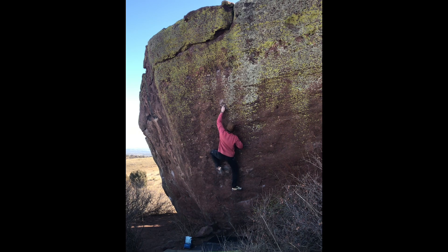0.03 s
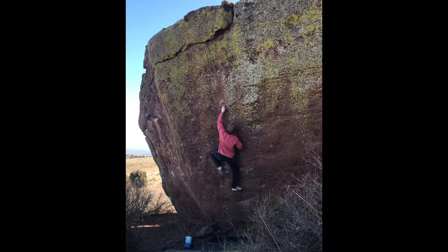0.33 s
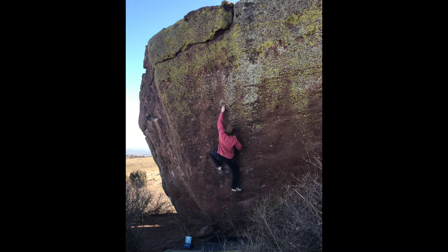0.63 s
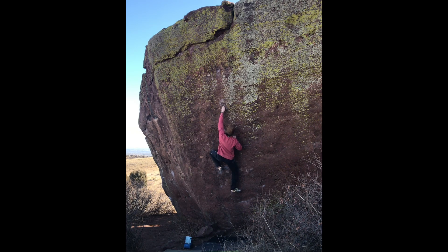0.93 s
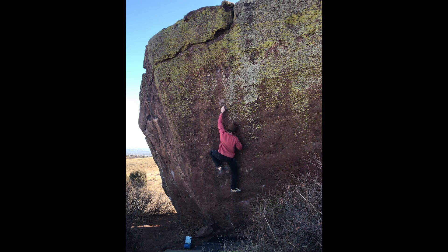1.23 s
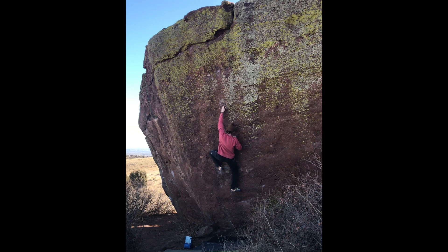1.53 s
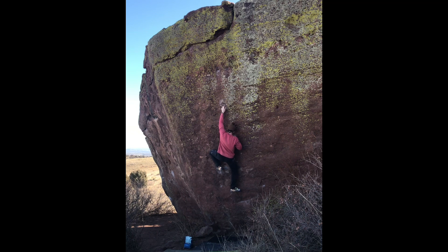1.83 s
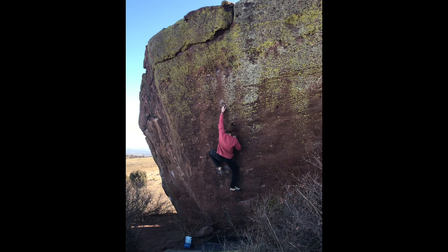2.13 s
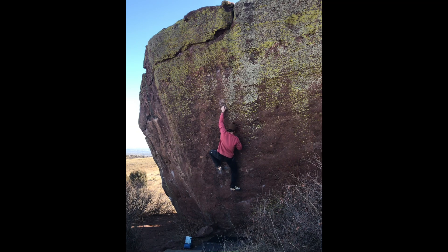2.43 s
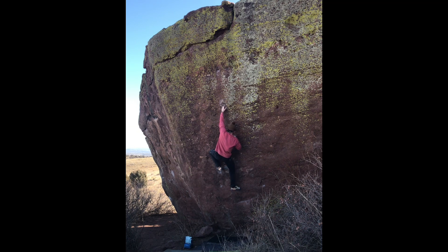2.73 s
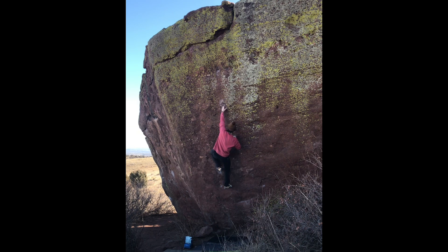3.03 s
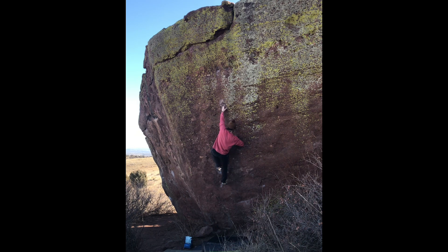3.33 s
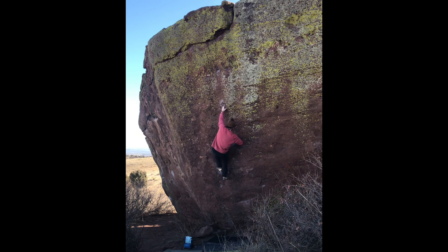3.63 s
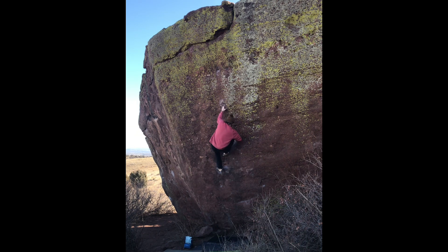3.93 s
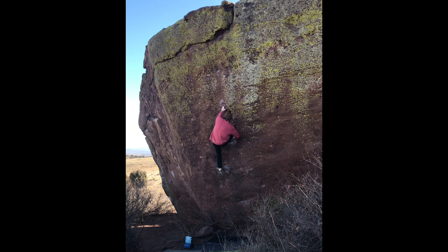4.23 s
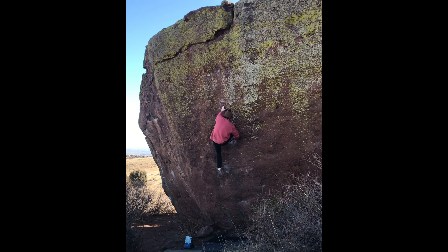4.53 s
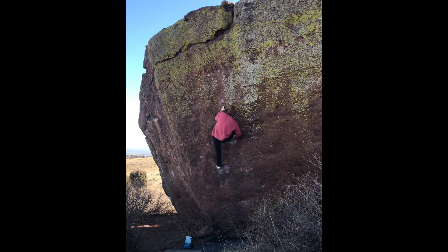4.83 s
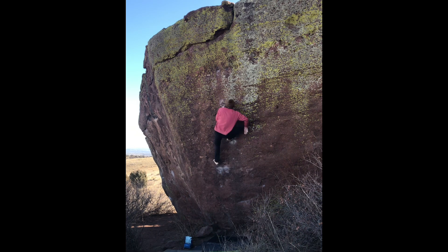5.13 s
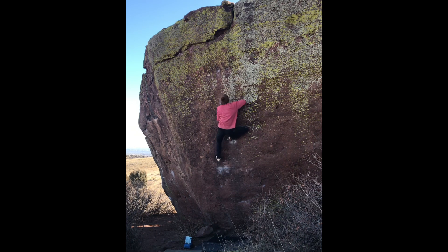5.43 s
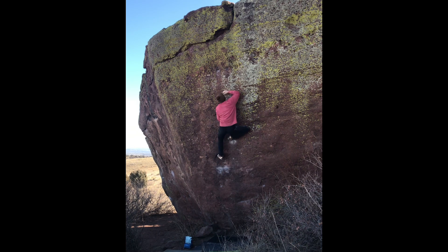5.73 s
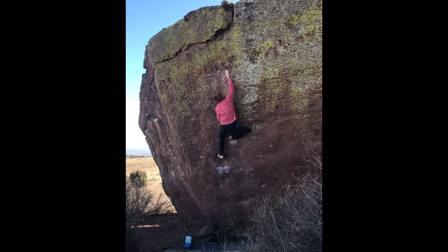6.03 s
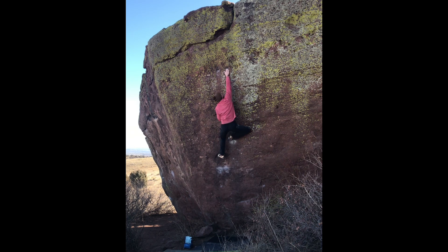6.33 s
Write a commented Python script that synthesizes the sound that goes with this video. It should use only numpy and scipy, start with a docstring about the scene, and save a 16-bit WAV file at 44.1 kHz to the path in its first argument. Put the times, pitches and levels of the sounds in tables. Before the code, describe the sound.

Far traffic makes a quiet, steady low rumble in open country, with a heavy engine droning inside it. Just after the start, a puff of wind gives a short low thump on the microphone, then weaker puffs die away. Later a few small dry ticks come from a climber on a nearby boulder, the clearest near the end. A phone on the ground picks it up with very faint hiss.

```python
"""Open country beside a boulder, heard by a phone on the ground. From the start, far traffic rumbles,
a heavy engine drones, and the phone's own electronics hiss and tick very faintly. Just after half a
second a puff of wind thumps on the microphone as eddies press on its port; weaker eddies follow and the
breeze dies away. From about two seconds on, a few small dry ticks ring nearby."""
import sys
import numpy as np
from scipy import signal
from scipy.fft import rfft, irfft
from scipy.io import wavfile
from scipy.ndimage import uniform_filter1d

SR = 44100
rng = np.random.default_rng(int(sys.argv[2]) if len(sys.argv) > 2 else 0)


def unload_audio(sound):
    """Save the sound as a 16-bit wav file, at the path given as the first command line argument."""
    columns = np.transpose(np.atleast_2d(sound))
    # keep every value between -1 and 1, then stretch to whole-number steps
    steps = np.round(np.clip(columns, -1, 1) * 32767)
    wavfile.write(sys.argv[1], SR, steps.astype(np.int16))


N = 285768
T = np.arange(N) / SR

# Loudness of the low drone's second and third harmonics over time: time_s, second_db, third_db
DRONE_LEVELS = [(0.0, -47, -54.5), (0.07, -51, -53.5), (0.2, -70, -56), (0.78, -43.5, -47.5),
                (1.26, -51.5, -57), (1.33, -69, -54.5), (1.39, -52, -49.5), (1.97, -40.5, -44.5),
                (2.16, -48.5, -44), (4.1, -41, -59), (4.37, -45.5, -62.5), (4.44, -58, -60),
                (4.98, -58, -47.5), (5.16, -52.5, -58), (5.87, -59.5, -47.5), (6.23, -68, -56.5),
                (6.33, -56, -46.5), (6.48, -64, -57)]
# Tones of other far engines: pitch_hz, level_db
ENGINE_HUMS = [(73, -61.5), (216, -73.5), (260, -72), (322, -82), (481, -85), (602, -86)]
# Engine rumble of the road: frequency_hz, relative_density_db
RUMBLE_SPECTRUM = [(18, -32), (35, -6), (60, 0.5), (85, 1), (115, 0), (160, -0.5), (210, -5), (280, -13),
                   (345, -16.5), (440, -25), (800, -44.5)]
# Tyre roar, its treble absorbed by the air: frequency_hz, relative_density_db
TYRE_SPECTRUM = [(150, -14.5), (400, -4), (600, -0.5), (800, 1), (980, 0.5), (1170, -8), (1600, -13),
                 (2200, -20.5), (4000, -41)]
# Tones of one vehicle's tread: pitch_hz, filter_width_hz, relative_db
TREAD_TONES = [(787, 75, -2), (884, 100, -3.5), (990, 102, -4)]
# Microphone hiss: frequency_hz, relative_density_db
HISS_SPECTRUM = [(1000, 5), (2300, -0.5), (2970, 3.5), (3400, 1), (4400, 2), (4950, -5), (5400, -1),
                 (7100, -2.5), (7600, -4.5), (8300, -2.5), (9600, -3), (10450, -15.5), (12400, -2.5),
                 (15500, -11.5)]
# Fast electrical patter: frequency_hz, relative_density_db
PATTER_SPECTRUM = [(1800, -12), (3000, 4.5), (4200, -5.5), (5200, -17), (10500, -9), (12700, -13),
                   (16000, -29)]
# Slow, sharper electrical tick: frequency_hz, relative_density_db
SHARP_TICK_SPECTRUM = [(1800, -20), (3200, -3), (9000, -4), (11000, -19), (16000, -18)]
# Gusts on the microphone: arrival_s, hold_s, level_db
WIND_GUSTS = [(0.034, 0.083, -47), (0.552, 0.081, -39), (0.683, 0.15, -35.5), (1.394, 0.4, -49.5)]
# Large eddies: frequency_hz, relative_density_db
LARGE_EDDY_SPECTRUM = [(15, -30.5), (30, -10), (55, 5), (75, -1), (120, -10), (180, -18), (260, -27.5),
                       (400, -42), (800, -71), (2000, -98)]
# Small eddies: frequency_hz, relative_density_db
SMALL_EDDY_SPECTRUM = [(80, -9), (150, 2), (230, 5), (300, -5), (400, -19), (600, -41), (2000, -70)]
# Single swings of wind pressure: centre_s, pitch_hz, envelope_peak_db
WIND_BUFFETS = [(0.574, 50.5, -33.5), (.705, 56, -25), (.783, 100, -29.5), (.805, 147, -30.5),
                (.958, 75, -37), (1.41, 69, -36.5), (1.723, 81, -37.5), (2.277, 50, -34), (2.505, 50, -42),
                (2.93, 54.7, -43)]
# Dry ticks nearby: start_s, level_db, pitch_hz, relative_knock_db, t60_s
DRY_TICKS = [(1.8275, -58, 1370, -6, 0.018), (2.3277, -62, 1600, -12, .015),
             (3.8650, -61, 1490, -25, 0.045), (4.1476, -65.5, 1740, -20, 0.027),
             (5.0258, -47, 1700, 5, 0.011), (5.233, -62, 1600, -3, .012), (5.2770, -55, 1620, -18, 0.03),
             (5.536, -49, 1650, -14, 0.013)]
# Modes of a dry tick: pitch_ratio, relative_db
RING_MODES = [(.92, 3), (1.08, 1), (1.53, -8), (1.85, -8), (2.38, -7)]


def undb(db):
    """Amplitude grows tenfold for every 20 decibels."""
    return 10 ** (np.asarray(db) / 20)


def unit(x):
    """Normalisation to an rms of 1."""
    return x / np.sqrt(np.mean(x ** 2))


def drift(rate_hz):
    """Slow random modulation: held values, smoothed twice, with a spread near 1."""
    hold = max(int(SR / rate_hz), 1)
    steps = np.repeat(rng.standard_normal(N // hold + 1), hold)
    return 1.3 * uniform_filter1d(uniform_filter1d(steps, hold), hold)[:N]


def coloured_noise(spectrum):
    """Spectral shaping: white noise takes on the given colour, at an rms of 1."""
    hz, db = np.transpose(spectrum)
    bins_hz = np.maximum(np.fft.rfftfreq(N, 1 / SR), 1)
    gain = undb(np.interp(np.log(bins_hz), np.log(hz), db))
    return unit(irfft(rfft(rng.standard_normal(N)) * gain, N))


def resonate(x, hz, width_hz):
    """A second-order resonance passes one band, with a gain of 1 at its centre."""
    return signal.lfilter(*signal.iirpeak(hz, hz / width_hz, fs=SR), x)


def engines(fundamental_hz=43.37, wander=0.0034, waver_db=1.5, hum_wander=0.00694, hum_fade_db=3):
    """Periodic exhaust sounds in low harmonics, or orders; moving air makes them waver."""
    phase = 2 * np.pi * np.cumsum(fundamental_hz * (1 + wander * drift(4.21))) / SR
    time_s, *levels_db = np.transpose(DRONE_LEVELS)
    second_db, third_db = (np.interp(T, time_s, column) for column in levels_db)
    fourth_db = third_db - 15 + 3 * drift(6.9)  # weak, and follows the third
    tones = 0
    for order, db in (2, second_db - 0.5), (3, third_db + 0.26), (4, fourth_db):
        tones += undb(db + waver_db * drift(12)) * np.sin(order * phase + 2 * np.pi * rng.random())
    for hz, db in ENGINE_HUMS:
        cycles = np.cumsum(hz * (1 + hum_wander * drift(7))) / SR
        tones += undb(db + hum_fade_db * drift(5)) * np.sin(2 * np.pi * cycles)
    return np.sqrt(2) * tones  # rms to sine amplitude


def traffic(rumble_db=-56.5, swell_db=0.5, roar_db=-66, flicker_db=0.6):
    """Incoherent addition: many vehicles blur into a rumble and a soft roar of tyres."""
    rumble = coloured_noise(RUMBLE_SPECTRUM) * undb(rumble_db + swell_db * drift(2.9))
    roar = coloured_noise(TYRE_SPECTRUM) * undb(roar_db + flicker_db * drift(14))
    return rumble + roar


def tyre_whine(peak_s=0.59, peak_db=-62.5, rise_db_per_s=33, fall_db_per_s=14.5, waver_db=0.7):
    """A repeating tread pattern sings in narrow bands; one vehicle's whine swells and fades."""
    level_db = peak_db + np.minimum(rise_db_per_s * (T - peak_s), fall_db_per_s * (peak_s - T))
    whine = 0
    for hz, width_hz, db in TREAD_TONES:
        band = resonate(rng.standard_normal(N), hz, width_hz)
        whine += undb(db) * unit(resonate(band, hz, width_hz))  # a second pass steepens the skirts
    return unit(whine) * undb(level_db + waver_db * drift(12))


def pulses(first_s, period_s, decay_s):
    """Envelope of a periodic pulse train, each pulse decaying exponentially."""
    return np.exp(-((T - first_s) % period_s) / decay_s)


def electronics(hiss_db=-74.5, shimmer_db=0.63, patter_db=-67, tick_db=-60):
    """Circuit self-noise: hiss, a fine patter twenty times a second and a slower, sharper tick."""
    hiss = coloured_noise(HISS_SPECTRUM) * undb(hiss_db + shimmer_db * drift(50))
    patter = coloured_noise(PATTER_SPECTRUM) * pulses(first_s=0.0335, period_s=0.05, decay_s=0.0014)
    tick = coloured_noise(SHARP_TICK_SPECTRUM) * pulses(first_s=0.5225, period_s=1.28, decay_s=0.0011)
    return hiss + patter * undb(patter_db) + tick * undb(tick_db)


def gust(arrival_s, hold_s, attack_s=0.019, release_s=0.043):
    """Envelope of a gust: a linear rise up to its arrival, a hold, an exponential decay."""
    rise = np.clip(1 + (T - arrival_s) / attack_s, 0, 1)
    return rise * np.exp(-np.maximum(T - arrival_s - hold_s, 0) / release_s)


def wind(breeze_db=-50, fall_db_per_s=3.5, stir_db=-68.5, flutter_db=-53, unrest_db=2.0):
    """Turbulence: eddies press on the microphone port, harder as the force of the air grows."""
    gusts = sum(gust(arrival_s, hold_s) * undb(db) for arrival_s, hold_s, db in WIND_GUSTS)
    # the strongest gust brings a breeze that dies away to a faint stir
    breeze_s = max(WIND_GUSTS, key=lambda row: row[2])[0]
    breeze = gust(breeze_s, N / SR) * undb(breeze_db - fall_db_per_s * (T - breeze_s))
    force = np.sqrt(gusts ** 2 + breeze ** 2 + undb(stir_db) ** 2)
    eddies = coloured_noise(LARGE_EDDY_SPECTRUM)
    eddies /= np.sqrt(uniform_filter1d(eddies ** 2, size=1500))  # levelled, so force sets their strength
    # only fast air sheds the small eddies that flutter higher up
    flutter = coloured_noise(SMALL_EDDY_SPECTRUM) * undb(flutter_db) * (force / force.max()) ** 1.6
    return (eddies * force + flutter) * undb(unrest_db * drift(20))


def buffets(sigma_cycles=0.66):
    """The largest eddies pass as single swings of pressure, each a sine under a Gaussian envelope."""
    pressure = np.zeros(N)
    for centre_s, hz, db in WIND_BUFFETS:
        cycles = hz * (T - centre_s)
        envelope = undb(db) * np.exp(-0.5 * (cycles / sigma_cycles) ** 2)
        pressure += envelope * np.sin(2 * np.pi * cycles)
    return pressure


def dry_ticks(rise_s=0.00045, knock_hz=720, scatter_db=-23, scatter_t60_s=0.16):
    """Damped modes ring over a lower knock, higher ones dying sooner; rock and ground scatter a tail."""
    ticks = np.zeros(N)
    t = np.arange(SR // 8) / SR
    attack = 1 - np.exp(-t / rise_s)
    for start_s, db, hz, knock_db, t60_s in DRY_TICKS:
        ring = sum(undb(mode_db - 60 * t * ratio / t60_s) * np.sin(2 * np.pi * hz * ratio * t)
                   for ratio, mode_db in RING_MODES)
        knock = undb(knock_db - 60 * t / t60_s) * np.sin(2 * np.pi * knock_hz * t)
        scatter = unit(resonate(rng.standard_normal(len(t)), hz, width_hz=hz / 2))
        tail = scatter * undb(scatter_db - 60 * t / scatter_t60_s)
        start = int(start_s * SR)
        ticks[start:start + len(t)] += undb(db) * attack * (ring + knock + tail)
    return ticks


def scene():
    """Superposition: all sources add in the one microphone channel."""
    return (engines() + traffic() + tyre_whine() + electronics() + wind() + buffets() + dry_ticks())[None]


def record(dry):
    """Band limiting: the phone drops the deepest bass and cuts the top."""
    bottom_hz, top_hz = 20, 15700
    highpass = signal.butter(2, bottom_hz, "high", fs=SR, output="sos")
    lowpass = signal.ellip(10, 0.1, 70, top_hz, fs=SR, output="sos")
    return signal.sosfilt(lowpass, signal.sosfilt(highpass, dry))


dry = scene()
out = record(dry)
unload_audio(out)
```